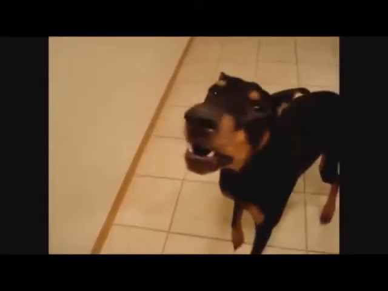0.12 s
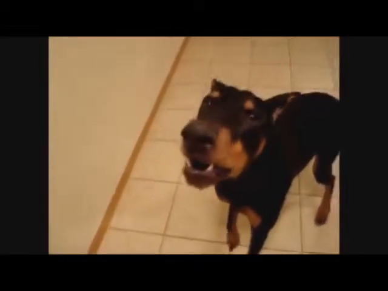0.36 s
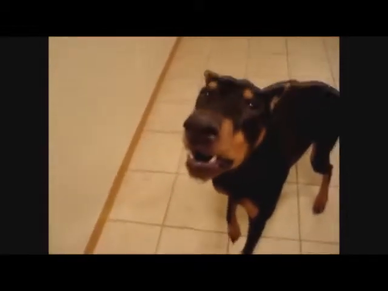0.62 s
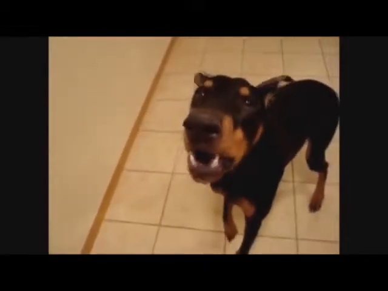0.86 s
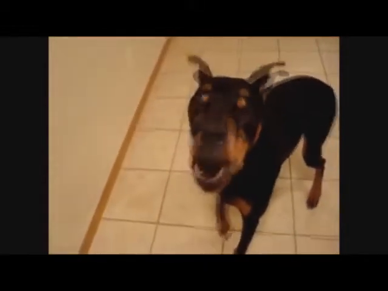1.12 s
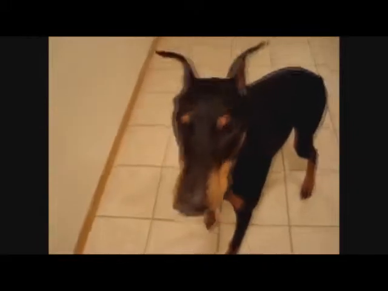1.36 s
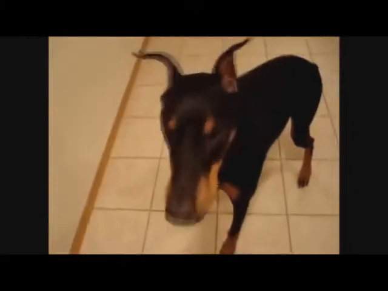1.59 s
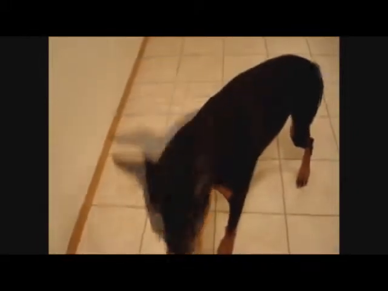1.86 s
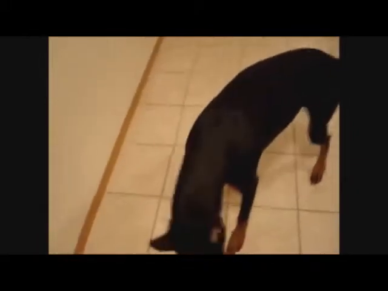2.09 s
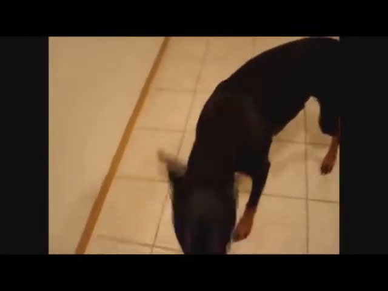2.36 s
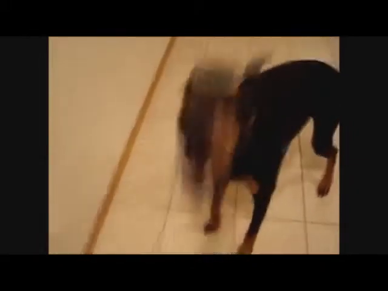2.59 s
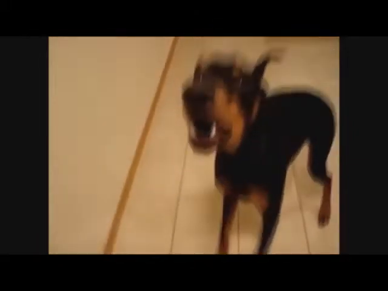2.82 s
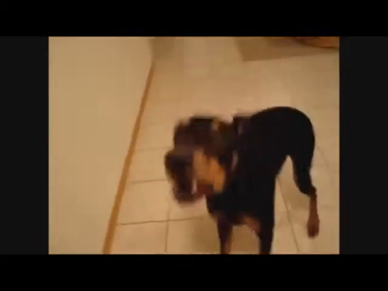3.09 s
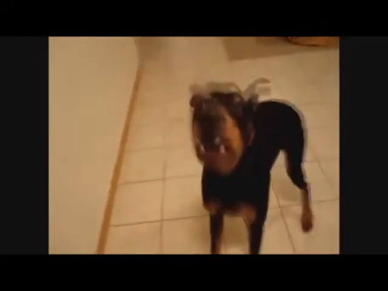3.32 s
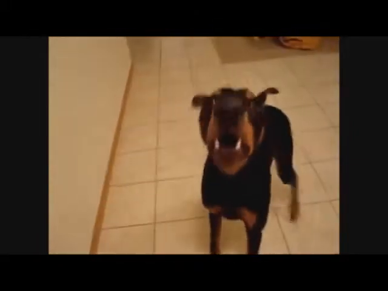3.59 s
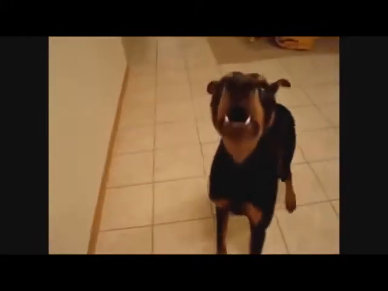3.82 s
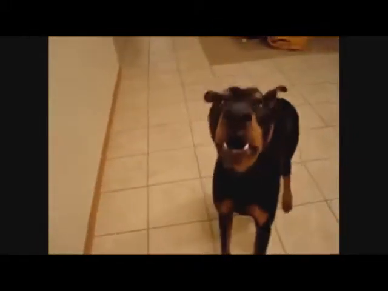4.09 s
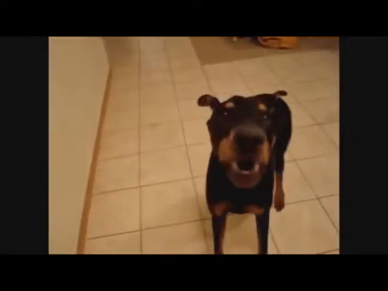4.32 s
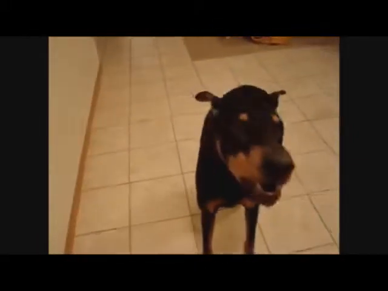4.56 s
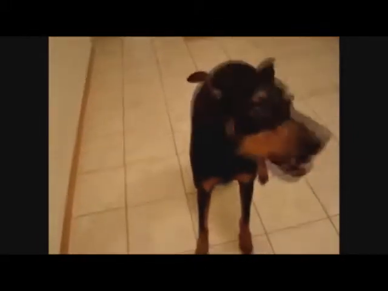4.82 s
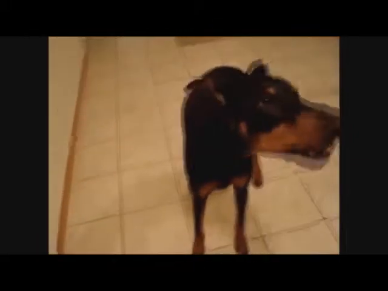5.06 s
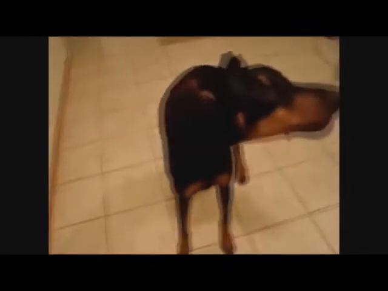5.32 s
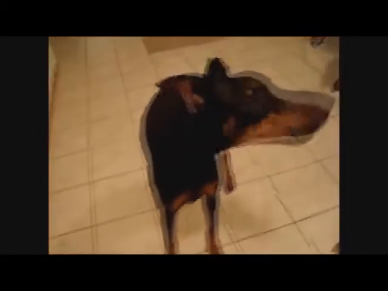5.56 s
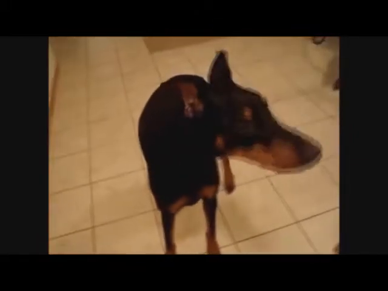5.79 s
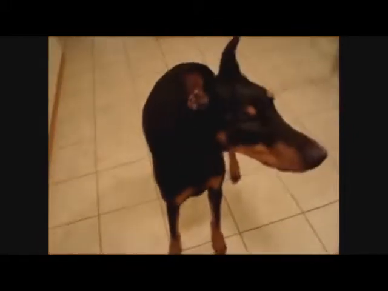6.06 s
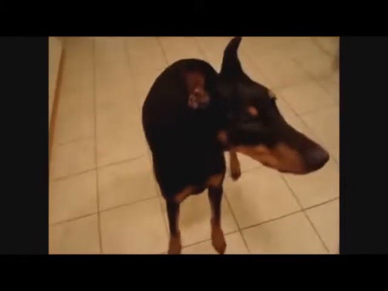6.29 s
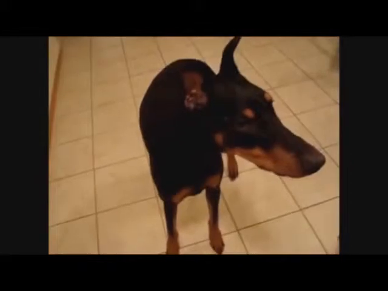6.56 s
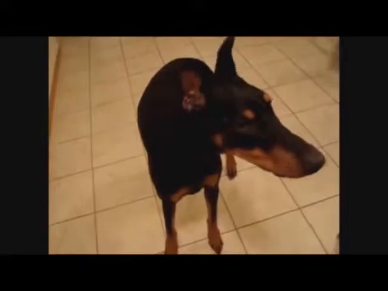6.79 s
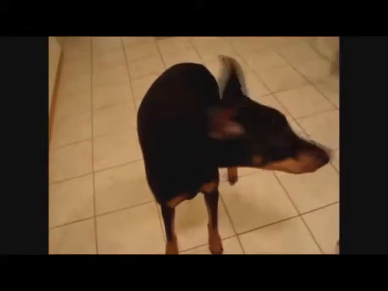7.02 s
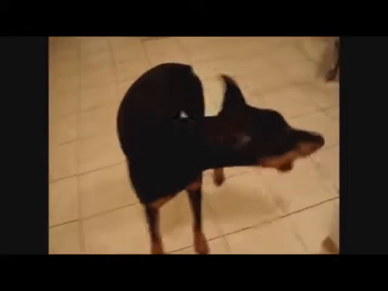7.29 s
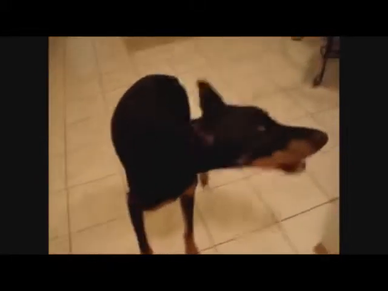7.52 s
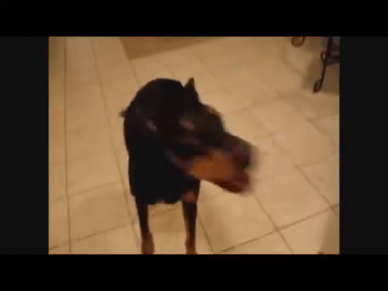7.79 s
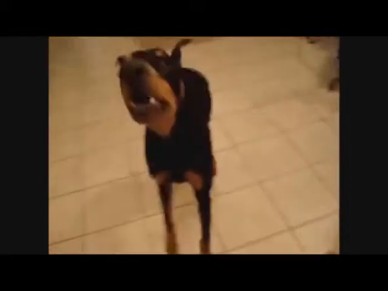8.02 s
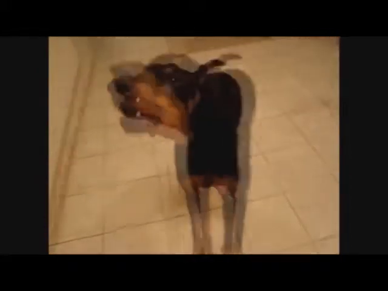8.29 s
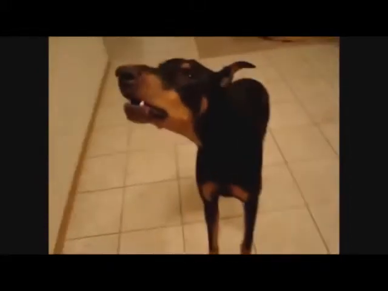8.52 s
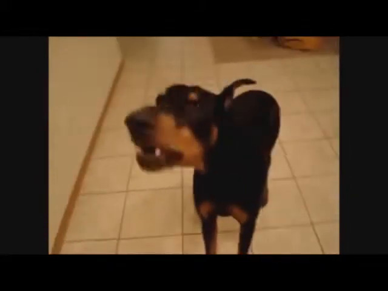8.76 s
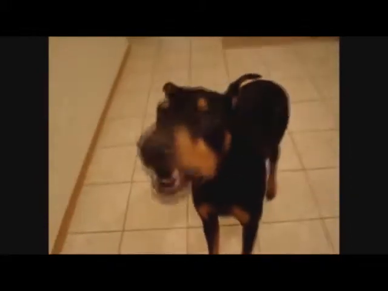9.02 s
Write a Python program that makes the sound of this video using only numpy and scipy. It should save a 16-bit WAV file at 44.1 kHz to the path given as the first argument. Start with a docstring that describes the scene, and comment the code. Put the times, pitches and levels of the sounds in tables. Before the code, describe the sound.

A large dog howls close to the microphone in a ringing tiled hallway. A high, steady howl is already under way and stops with a small upward squeak; the dog sniffs in air and its claws tick faintly. A long howl follows, rising from a low moan, cracking and leaping to a held high note. After a pause a third howl climbs, breaks roughly and holds, over soft hiss.

```python
"""A large dog howls three times, close by in a tiled hallway: harmonics of a jittering pitch plus throat air.
The first howl begins in falsetto; the next two climb in the chest voice, crack and jump to a falsetto whose
second harmonic is mostly the loudest. Shaped noise makes the breaths drawn between howls and short treble bursts.
Claws tick as decaying tile modes, the hallway rings on as a noise tail whose pitches die at their own speeds,
and a bed of hiss and thin whine lies below; a limiter and a rounding amplifier hold the loudest peaks."""
import sys
import numpy as np
from scipy import signal
from scipy.fft import rfft, irfft, next_fast_len
from scipy.io import wavfile
from scipy.ndimage import uniform_filter1d, minimum_filter1d, map_coordinates

SR = 44100
rng = np.random.default_rng(int(sys.argv[2]) if len(sys.argv) > 2 else 0)


def wav_out(sig):
    """Save sig, one row per channel (or a flat mono array), as 16-bit PCM at SR to the path in sys.argv[1]."""
    wavfile.write(sys.argv[1], SR, np.round(np.clip(np.atleast_2d(sig).T, -1, 1) * 32767).astype(np.int16))


def boost(x):
    """Linear amplitude factor 10**(x/20) for a level x in decibels (scalar or array-like)."""
    u = np.asarray(x, float) / 20
    return 10 ** u


N = 403071

# Background hiss, colour: freq_hz, density_db (per Hz, relative)
HISS_COLOUR = [(20, 2.5), (100, -8), (276, 1.5), (450, 4), (1710, -1), (2820, -4), (9950, -9.5)]
# Background hiss, loudness over time: time_s, level_db (rms)
HISS_LEVEL = [(6.1, -54.5), (7.0, -52)]
WHINE_HZ = 7600
TOP_HZ = 9990  # nothing of the limited mix is kept above this
LIMIT, CLIP_TOP, CLIP_KNEE = 1.08, 1.06, 9  # limiter ceiling, amplifier top (amplitudes), sharpness of its rounding

# How long the hallway rings: freq_hz, t60_s
HALL_DECAY = [(300, .5), (1050, 0.74), (1600, 0.56), (3000, 0.56)]
# Claws striking the floor: start_s, peak_db
CLAW_TICKS = [(1.703, -34.5), (1.827, -39)]
# Modes of a struck tile: freq_hz, level_db (usual), t60_s
TILE_MODES = [(883, 0, 0.045), (1315, 2, 0.031)]

# Short bursts of treble noise: start_s, level_db (before the decay)
TREBLE_BURSTS = [(2.139, -32.5), (2.56, -30.5), (3.278, -38), (3.688, -35.5), (4.278, -35.5),
                 (7.546, -30.5), (8.45, -35)]
# Colour of those bursts: freq_hz, density_db (per Hz, relative)
BURST_COLOUR = [(2500, -36.5), (3300, 7), (7000, 5.5), (9900, -8)]
# Breaths drawn in: start_s, length_s, level_db (rms before swell and sag)
INHALES = [(1.268, 0.27, -31), (5.716, 0.23, -49.5)]
# Colour of the drawn breath: freq_hz, density_db (per Hz, relative)
NOSE_COLOUR = [(500, 0), (900, -7.5), (2800, -9.5), (3100, 0), (3600, -23), (7800, -62)]
INHALE_RISE_S, INHALE_SAG_DB = 0.12, -21  # soft edges; sag reached at the end, ever faster

# Extent of each howl: start_s, end_s
HOWLS = [(-.01, 1.245), (2.086, 5.665), (7.07, 9.2)]
# The voice before catch and flip, one table per howl: time_s, pitch_hz, fundamental_db, second_harmonic_db
VOICE = [
    [(0.0, 536, -32.5, -8.5), (0.11, 544, -24.5, -11.5), (0.33, 548, -18.5, -9.5),
     (0.76, 548.7, -28, -10.5), (0.85, 539.1, -29, -13), (0.92, 545.3, -25, -9), (1.08, 536, -27, -11.5),
     (1.14, 536.4, -30.5, -14.5), (1.2, 534.6, -18, -11)],
    [(2.1, 301.5, -28.5, -34), (2.17, 296.7, -31.5, -40.5), (2.24, 300.3, -22.5, -32),
     (2.3, 320.4, -29.5, -27.5), (2.37, 362.9, -16, -16.5), (2.5, 431.6, -12, -21),
     (2.58, 510.7, -13.5, -5), (2.63, 529.4, -22.5, -13.5), (2.69, 519.5, -24.5, -25),
     (2.74, 484, -17.5, -25), (2.81, 442, -12.5, -20), (2.93, 503, -10, -14.5), (3.02, 468.4, -15, -15),
     (3.035, 587, -16.5, -15.5), (3.095, 592.7, -18.5, -10), (3.145, 582.3, -18, -19),
     (3.4, 557.8, -17, -11.5), (3.455, 552.3, -33, -26), (3.48, 551, -19.5, -12.5),
     (3.57, 546.5, -24.5, -17), (3.645, 543.1, -26.5, -14), (3.865, 539.2, -22, -8), (4.115, 529, -31, -8),
     (4.275, 535.6, -23, -8), (4.745, 533, -29, -8), (4.935, 519.2, -17, -13.5), (5.085, 509.2, -11, -13.5),
     (5.165, 516.2, -11.5, -13.5), (5.295, 524.7, -28.5, -6.5), (5.495, 524.1, -15.5, -12.5),
     (5.62, 535.2, -15.5, -19)],
    [(7.11, 337.9, -25.5, -23), (7.175, 307.1, -25, -22.5), (7.315, 299.7, -19, -33.5),
     (7.375, 304.8, -25, -33.5), (7.455, 332.2, -10, -37.5), (7.49, 358, -8, -23.5),
     (7.525, 417.2, -12, -13), (7.555, 467, -24.5, -10), (7.595, 499.2, -23.5, -6.5),
     (7.665, 503.1, -11, -14.5), (7.715, 472, -15.5, -13), (7.73, 578, -24, -20), (7.905, 609.7, -14.5, -9),
     (7.925, 493.5, -24.5, -15.5), (7.965, 476.5, -19, -8.5), (8.035, 484.5, -27.5, -23.5),
     (8.05, 567.3, -23, -16.5), (8.13, 568.7, -19, -9.5), (8.19, 567.4, -16.5, -22),
     (8.32, 557, -14.5, -17.5), (8.55, 551, -20, -11), (8.65, 545.5, -23, -26.5), (8.72, 538, -22.5, -10.5),
     (8.79, 541, -24.5, -11.5), (9.04, 543.5, -22.5, -14.5), (9.13, 536.8, -21, -10)],
]
# Brightness, level of three overtone regions: time_s, mouth_db, ringing_db, treble_db
BRIGHTNESS = [(0.05, -24, -69.5, -41.5), (0.5, -35, -62.5, -44), (1.15, -36, -65, -50),
              (2.15, -45, -71, -53), (2.4, -39, -47, -53.5), (2.65, -39, -50.5, -44),
              (3.0, -37.5, -53, -46), (3.4, -34, -63.5, -42), (3.7, -32.5, -47.5, -40),
              (4.2, -30.5, -62.5, -43), (4.85, -47, -31, -47), (5.05, -47, -41.5, -41),
              (5.35, -51.5, -35.5, -45.5), (5.62, -67.5, -57.5, -57.5), (7.15, -42.5, -76.5, -54),
              (7.3, -39.5, -67, -47.5), (7.46, -40.5, -56, -49.5), (7.6, -30, -46, -43),
              (7.95, -37.5, -51, -41.5), (8.3, -34, -54, -44.5), (8.901, -25.5, -36.5, -46),
              (9.1, -21, -62, -43)]
# Shapes of those regions, for the fifth harmonic and up: freq_hz, level_db
MOUTH_SHAPE = [(1200, 12), (1500, 6), (2100, 6), (2750, -3), (3050, -22.5), (3700, -47)]
RING_SHAPE = [(3800, -27.5), (4250, 2), (4650, -24.5)]
TREBLE_SHAPE = [(5000, -23.5), (5800, -5.5), (6400, -13), (7000, -10.5), (7700, -26), (8500, -21),
                (9900, -27.5)]
# Third and fourth harmonics against the loudness of the voice, in each register: freq_hz, level_db
CHEST_SHAPE = [(850, -9), (1100, -26.5), (1400, -20), (1750, -18), (2200, -21.5), (2900, -30)]
FALSETTO_SHAPE = [(1400, -26), (1650, -25.5), (1900, -29), (2200, -28), (2400, -31), (2900, -37.5)]
# Times in falsetto, chest voice elsewhere: start_s, end_s
FALSETTO = [(-.01, 0.98), (3.031, 5.55), (7.723, 7.915), (8.043, 8.4)]
# A mouth resonance that moves with jaw and tongue and lifts overtones near it: time_s, centre_hz, lift_db
JAW = [(0, 1646, 3), (.6, 1642, 1.5), (1.2, 1620, -5), (2.15, 2150, 2.5), (2.3, 2200, 5), (2.38, 1508, 2.5),
       (2.5, 1804, 9), (2.59, 2025, 13.5), (2.7, 1508, 9.5), (2.83, 1734, 2.5), (2.9, 1504, 17),
       (3.02, 1460, 14), (3.2, 1760, 7.5), (3.7, 2210, 9.5), (4.7, 2134, 7), (5.2, 2093, 14),
       (5.6, 2130, -3.5), (7.17, 1195, 13), (7.3, 1480, 12), (7.45, 1620, 2), (7.53, 1688, 17),
       (7.6, 1974, 14.5), (7.66, 2000, 2.5), (7.72, 1940, 15.5), (7.92, 1680, 3.5), (8.02, 1470, 22.5),
       (8.15, 1700, 10), (8.4, 2276, 5.5), (9.14, 2183, 10)]
JAW_WIDTH_HZ = 140  # half the lift is left this far from the centre
# Low rumble that follows the level of the fundamental: freq_hz, density_db (per Hz, relative)
RUMBLE_COLOUR = [(20, -2.5), (200, 1), (330, -30.5)]
# Air rushing through the open throat: freq_hz, density_db (per Hz, relative)
THROAT_COLOUR = [(250, -58.5), (340, -14), (600, 3.5), (1200, 0.5), (2200, -5.5), (2900, -14),
                 (3300, -22.5), (5900, -20.5), (7000, -19.5), (7600, -32), (9900, -37)]
# Cracks, where the folds beat unevenly: start_s, end_s, roughness (0-1)
CRACKS = [(2.61, 2.76, .55), (7.9, 8.0, .65)]
CRACK_FADE_S, CHEST_ROUGH, FALSETTO_ROUGH = .05, .07, .02  # roughness 0-1 between cracks
ALTERNATE = 0.63  # in a crack every other beat is weakened
# Swells of the throat flap: start_s, end_s, added_depth (0-1)
FLUTTERS = [(3.04, 3.15, .18), (3.53, 3.68, .4), (3.5, 3.97, 0.19)]
# A slower flap of throat tissue beats against the falsetto: rate at a given pitch, Hz per Hz of pitch, usual depth
FLAP_HZ, FLAP_AT_HZ, FLAP_SLOPE, FLAP_DEPTH = 127.4, 543, 0.84, 0.029
# The folds start tight, high and rough, then settle (rise as a share of the pitch)
CATCH_S, CATCH_RISE, CATCH_ROUGH, CATCH_DB = .015, .35, 0.29, 1.5
CLOSED_DB = -28.5  # the mouth, still shut at the catch, muffles the overtones, the second harmonic by half as much
# An ending howl squeaks upward and loses its overtones
FLIP_S, FLIP_RISE, FLIP_SECOND_DB, FLIP_FIRST_DB = .037, .15, -14.5, 1.5


def unit(x):
    """Scaled to rms 1."""
    return x / np.sqrt(np.mean(x ** 2) + 1e-20)


def along(points, hz):
    """Reads (Hz, dB) points on a log frequency axis; -120 dB outside."""
    freq, db = np.transpose(points)
    return np.interp(np.log(hz + 1), np.log(freq + 1), db, -120, -120)


def curves(rows, t):
    """Every column after the time, read at times t."""
    s, *columns = np.transpose(rows)
    return [np.interp(t, s, column) for column in columns]


def bumps(rows, t, fade):
    """Soft-edged plateaus (start s, end s, height), summed."""
    return sum(height * np.clip(np.minimum(t - s, e - t) / fade + .5, 0, 1) for s, e, height in rows)


def wobble(rate, size=N):
    """A smooth random curve, rate knots a second."""
    knots = rng.standard_normal(int(size * rate / SR) + 4)
    return map_coordinates(knots, [np.arange(size) * rate / SR])


def noise(colour, size=N):
    """Noise of rms 1, coloured by weighting its spectrum."""
    m = next_fast_len(size + 8192)
    weight = boost(along(colour, np.fft.rfftfreq(m, 1 / SR)))
    return unit(irfft(rfft(rng.standard_normal(m)) * weight, m)[:size])


def span(start_s, end_s, fade):
    """First sample, times and soft-edged gate of a sound, kept inside the scene."""
    start = max(0, round(start_s * SR))
    t = np.arange(start, min(N, round(end_s * SR))) / SR
    gate = np.clip(np.minimum(t - start_s, end_s - t) / fade, 0, 1)
    return start, t, gate


def place(out, start, sound):
    """Mixes a sound into out from a given sample."""
    out[start:][:len(sound)] += sound


def background():
    """Steady coloured noise under a thin electrical whine, a single sine."""
    t = np.arange(N) / SR
    hiss = boost(curves(HISS_LEVEL, t)[0]) * noise(HISS_COLOUR)
    whine = boost(-74.5) * np.sin(2 * np.pi * WHINE_HZ * t)
    return hiss + whine


def hall(x):
    """Each frequency of the hallway's answer dies at its own speed: decaying noise convolved with the sound."""
    hz, t, bins = signal.stft(rng.standard_normal(SR), SR, nperseg=256)
    t60 = np.interp(hz, *np.transpose(HALL_DECAY))
    tail = signal.istft(bins * boost(-60 * t / t60[:, None]), SR, nperseg=256)[1]
    late = np.pad(x, (300, 0))  # samples before the answer begins
    return signal.fftconvolve(late, tail / np.linalg.norm(tail))[:N]


def claws():
    """Each tick excites the tile's modes at new strengths, and they ring down as sines."""
    out, t = np.zeros(N), np.arange(SR // 10) / SR
    for s, peak_db in CLAW_TICKS:
        ring = np.zeros(len(t))
        for hz, level_db, t60 in TILE_MODES:
            strength_db = level_db + rng.normal(0, 2)
            ring += boost(strength_db - 60 * t / t60) * np.sin(2 * np.pi * hz * t)
        place(out, round(s * SR), boost(peak_db) * ring / np.abs(ring).max())
    return out


def treble_bursts():
    """Short bursts of treble noise with a sharp onset and an exponential decay."""
    out, t = np.zeros(N + SR), np.arange(SR // 4) / SR
    for s, db in TREBLE_BURSTS:
        shape = boost(db - 60 * t / 0.22) * (1 - np.exp(-t / 0.00068))
        place(out, round(s * SR), shape * noise(BURST_COLOUR, size=len(t)))
    return out[:N]


def inhales():
    """Breath drawn in: turbulent noise that swells, then sags ever faster."""
    out = np.zeros(N + SR)
    for s, length, db in INHALES:
        start, t, gate = span(s, s + length, fade=INHALE_RISE_S)
        shape_db = db + INHALE_SAG_DB * ((t - s) / length) ** 2 + 1.5 * wobble(34, size=len(t))
        place(out, start, gate * boost(shape_db) * noise(NOSE_COLOUR, size=len(t)))
    return out[:N]


def jaw_lift(freq, t):
    """Gain in dB near the moving mouth resonance, a bell around its centre."""
    centre_hz, lift_db = curves(JAW, t)
    return lift_db / (1 + ((freq - centre_hz) / JAW_WIDTH_HZ) ** 2)


def upper_overtones(t, t0, hz, phase, blur, flicker_db):
    """Harmonics from the fifth up, weighted by mouth, ringing and treble regions, each drifting by itself."""
    tone = np.zeros(len(t))
    slow = slice(None, None, 64)  # gains are drawn every 64 samples
    slow_t, slow_hz = t[slow], hz[slow]
    # The mouth opens after the voice starts
    opening = np.clip((slow_t - t0) / 0.066, 0, 1) ** 2 if t0 > 0 else 1
    regions = (MOUTH_SHAPE, RING_SHAPE, TREBLE_SHAPE)
    for shape, region_db, drift_db in zip(regions, curves(BRIGHTNESS, slow_t), (5, 1.5, 5)):
        for k in range(5, int(shape[-1][0] / hz.min()) + 1):
            gain = boost(region_db + along(shape, k * slow_hz) + jaw_lift(k * slow_hz, slow_t))
            if gain.max() <= 1e-5:  # inaudible
                continue
            drift = drift_db * wobble(12 * 64, size=len(gain))  # each overtone's level drifts at random
            flicker = flicker_db[slow] * wobble(28 * 64, size=len(gain))
            level = np.interp(t, slow_t, opening * boost(drift + flicker) * gain)
            tone += level * np.sin(k * (phase + k * blur + k))
    return tone


def throat_flap(t, hz, falsetto, glide):
    """Throat tissue beats slower than the pitch and modulates the falsetto, faster at higher pitch."""
    rate_hz = FLAP_HZ + FLAP_SLOPE * (hz - FLAP_AT_HZ)
    rate_hz = rate_hz * (1 + 0.034 * wobble(30, size=len(t)))
    depth = falsetto * (FLAP_DEPTH + bumps(FLUTTERS, t, fade=0.054))
    flap = 1 + depth * np.sin(2 * np.pi * np.cumsum(rate_hz) / SR)
    return flap / (1 + (glide / 7) ** 2)  # the folds falter while the register flips


def howl(t0, t1):
    """One howl: harmonics of a jittering pitch, shaken by the flap, with breath pulsing once a cycle."""
    start, t, gate = span(t0, t1, fade=0.011)
    size = len(t)
    hz, first_db, second_db = curves(sum(VOICE, []), t)
    catch = np.exp(-(t - t0) / CATCH_S) * (t0 > 0)
    flip = np.tanh(2.1 * np.clip(1 - (t1 - t) / FLIP_S, 0, 1))
    falsetto = bumps([(s, e, 1) for s, e in FALSETTO], t, fade=0.0078)
    crack = bumps(CRACKS, t, CRACK_FADE_S)

    # The larynx cannot turn corners
    hz = uniform_filter1d(hz * (1 + CATCH_RISE * catch + FLIP_RISE * flip), size=221)
    glide = np.abs(np.gradient(np.log(hz))) * SR  # pitch change, share per second
    rough = falsetto * FALSETTO_ROUGH + (1 - falsetto) * CHEST_ROUGH
    rough = np.clip(rough + CATCH_ROUGH * catch + crack, 0, 1)
    jitter = .1 * rough * wobble(280, size=size) + 0.0018 * wobble(25, size=size)
    phase = 2 * np.pi * np.cumsum(hz * (1 + jitter)) / SR

    first_db = first_db + CATCH_DB * catch + FLIP_FIRST_DB * flip
    second_db = second_db + (CATCH_DB + CLOSED_DB / 2) * catch + FLIP_SECOND_DB * flip
    effort = uniform_filter1d(boost(first_db) + boost(second_db), size=4410)
    effort_db = 20 * np.log10(effort) + FLIP_SECOND_DB * flip
    low_db = [first_db, second_db]
    for k in (3, 4):
        register_db = falsetto * along(FALSETTO_SHAPE, k * hz) + (1 - falsetto) * along(CHEST_SHAPE, k * hz)
        mouth_db = jaw_lift(k * hz, t) + CLOSED_DB * catch ** .5
        low_db.append(effort_db + register_db + mouth_db + 2.7 * wobble(8.99, size=size))

    # A gliding overtone runs over the hallway's peaks and dips
    flicker_db = 4 * np.tanh(glide) + 1.3 * (1 - falsetto)
    tone = np.zeros(size)
    for k, db in enumerate(low_db):
        tone += boost(db + flicker_db * wobble(28, size=size)) * np.sin((k + 1) * phase + k)
    # Cycle-to-cycle timing scatter fuzzes the high overtones most
    blur = (.0015 + .05 * rough) * wobble(300, size=size)
    tone += upper_overtones(t, t0, hz, phase, blur, flicker_db)

    flap = throat_flap(t, hz, falsetto, glide)
    shimmer = 1 + .5 * rough * wobble(220, size=size) + ALTERNATE * crack * np.cos(phase / 2)
    gusts_db = 1.5 * wobble(9, size=size)
    pulse = 1 + 0.22 * np.cos(phase)
    breath = effort * boost(-30.0 + 26 * rough + gusts_db) * pulse * noise(THROAT_COLOUR, size=size)
    low_cut = signal.butter(8, 270, "high", fs=SR, output="sos")
    voice = signal.sosfilt(low_cut, np.sqrt(2) * tone * flap * shimmer + breath)
    rumble = boost(low_db[0] - 46.0 + 4.7 * wobble(36, size=size)) * noise(RUMBLE_COLOUR, size=size)
    return start, gate * (voice + rumble)


def dog():
    """The howls and the breaths drawn after the first two."""
    out = np.zeros(N)
    for t0, t1 in HOWLS:
        place(out, *howl(t0, t1))
    return out + inhales()


def scene():
    """Dog, claws and treble bursts with the hallway's echo, over hiss and whine, in mono."""
    near = dog() + claws() + treble_bursts()
    return (near + boost(-6.0) * hall(near) + background())[None]


def band_limit(x):
    """A steep low-pass at the top of the band."""
    return signal.sosfilt(signal.butter(12, 9980, fs=SR, output="sos"), x)


def record(dry):
    """A limiter ducks around the loudest peaks, the amplifier rounds them, and the top of the band is cut."""
    need = np.minimum(1, LIMIT / (np.abs(dry) + 1e-9))
    held = dry * uniform_filter1d(minimum_filter1d(need, size=441), size=441)
    rounded = held / (1 + np.abs(held / CLIP_TOP) ** CLIP_KNEE) ** (1 / CLIP_KNEE)
    m = next_fast_len(N + 8192)
    in_band = np.fft.rfftfreq(m, 1 / SR) < TOP_HZ
    mix = irfft(rfft(rounded, m) * in_band, m)[:, :N]
    return band_limit(mix)


dry = scene()
out = record(dry)
wav_out(out)
```